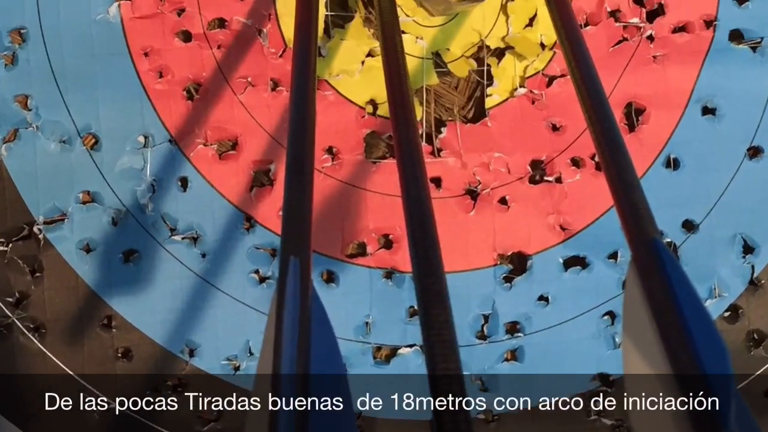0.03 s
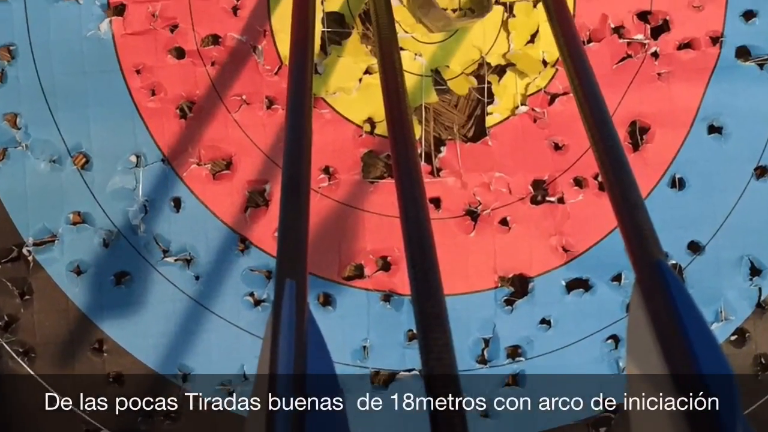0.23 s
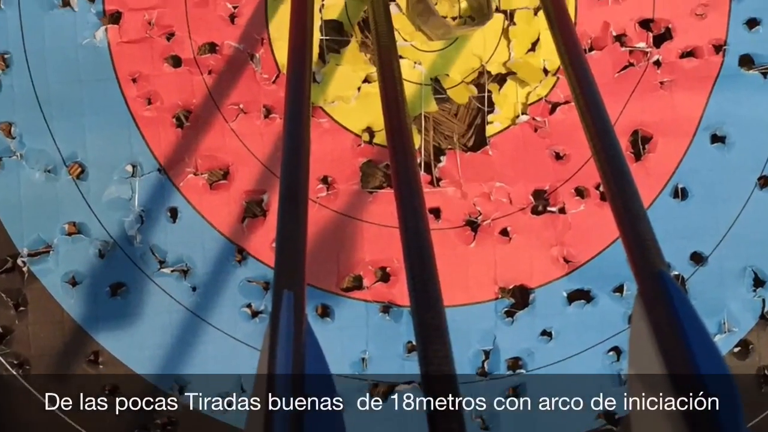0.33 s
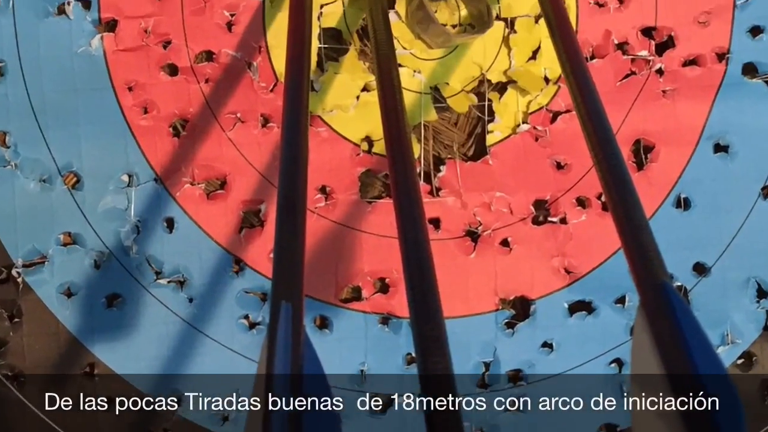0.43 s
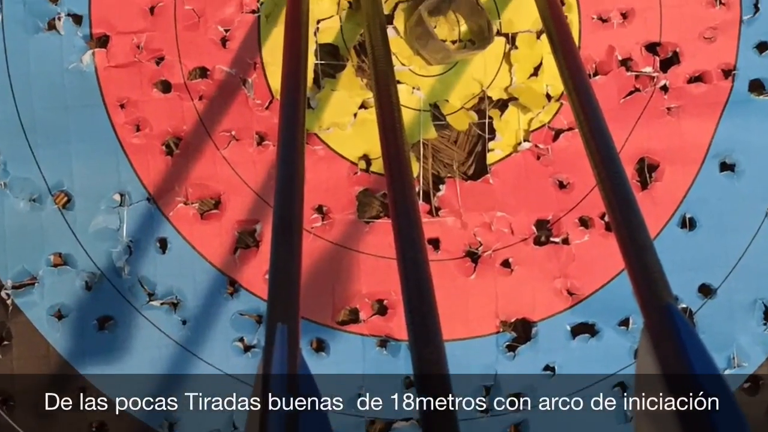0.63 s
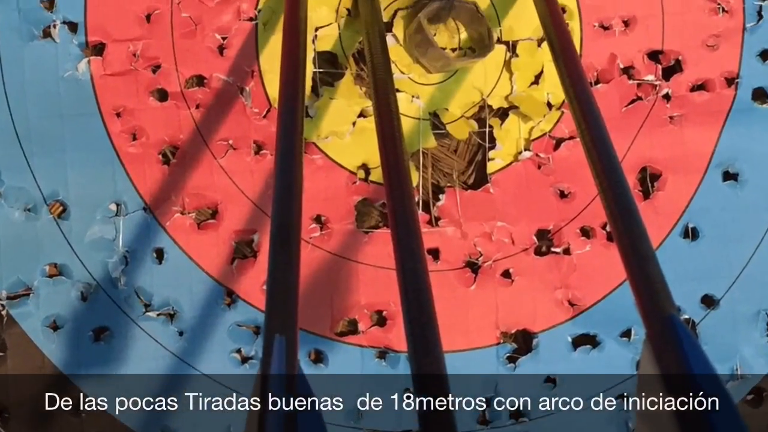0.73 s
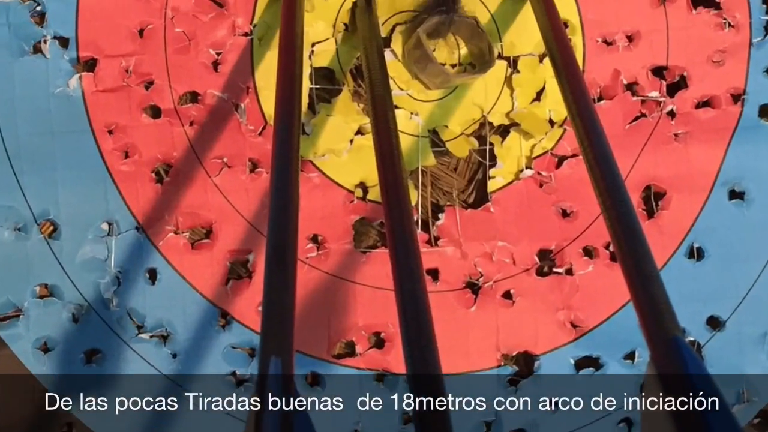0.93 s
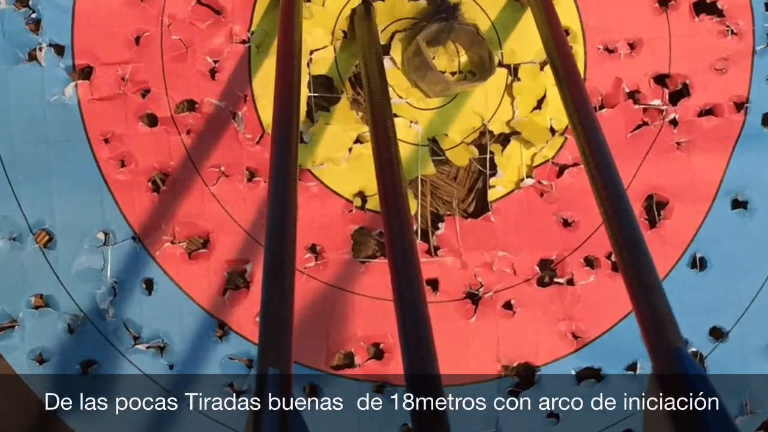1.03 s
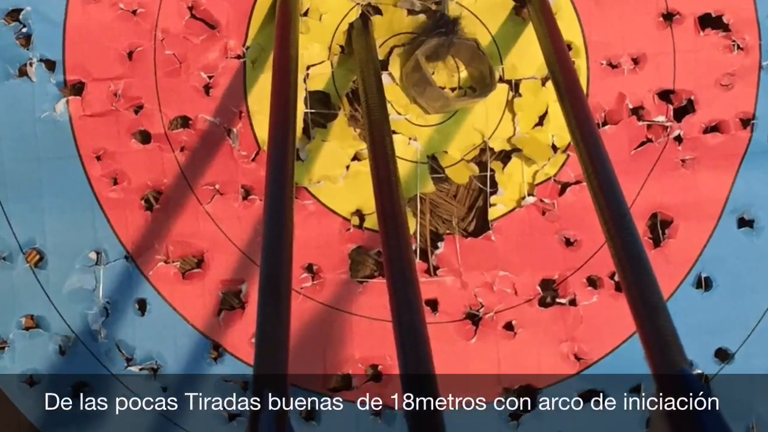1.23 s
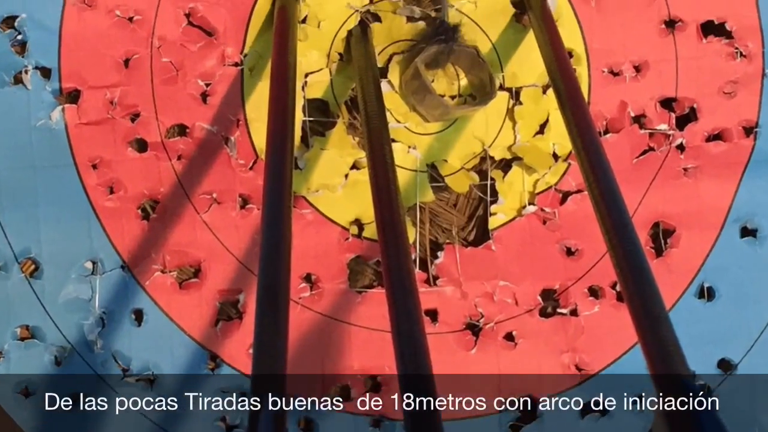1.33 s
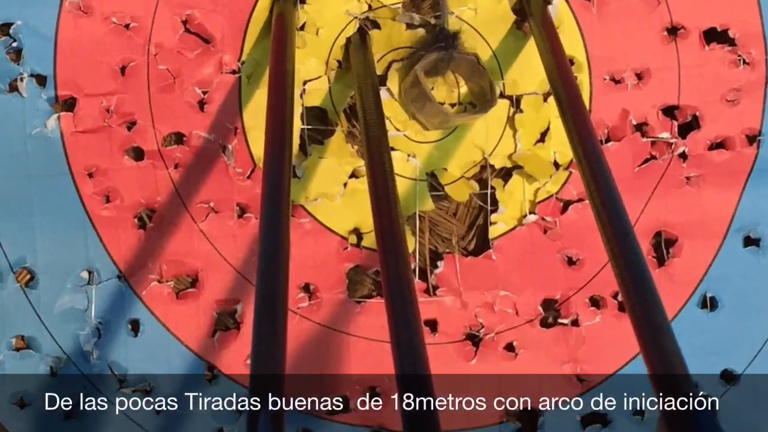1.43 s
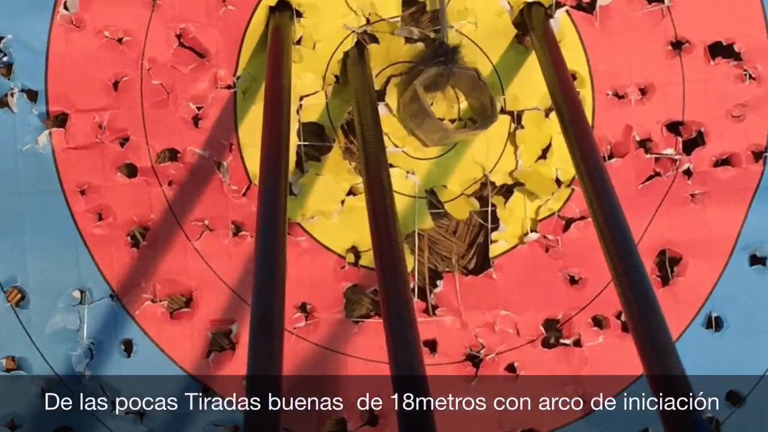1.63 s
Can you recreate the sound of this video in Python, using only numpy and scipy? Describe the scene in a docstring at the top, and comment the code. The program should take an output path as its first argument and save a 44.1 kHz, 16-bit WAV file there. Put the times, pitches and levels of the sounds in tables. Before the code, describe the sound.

Three heavy footsteps crunch on dry, gritty ground, close by outdoors.

```python
"""Dry, gritty ground cracks and crunches under three heavy steps, close by and outdoors.
Each step is a run of dull thuds and crisp snaps as the crust gives way, over a crunch of breaking
grains and a fine rustle of friction. Small stones tick, grit slips, and stray bits snap between steps.
The surroundings answer faintly, and behind it all the air hisses and rumbles softly."""
import sys
import numpy as np
from scipy import signal
from scipy.fft import rfft, irfft, next_fast_len
from scipy.io import wavfile

SR = 44100
rng = np.random.default_rng(int(sys.argv[2]) if len(sys.argv) > 2 else 0)


def to_wav(s):
    """Save 16-bit WAV."""
    ch = np.atleast_2d(s).T  # columns
    pcm = np.round(np.clip(ch, -1, 1) * 32767)  # PCM
    wavfile.write(sys.argv[1], SR, pcm.astype(np.int16))


N = 74970
TIME = np.arange(N) / SR
FFT_SIZE = next_fast_len(2 * N)
FREQS = np.maximum(np.arange(FFT_SIZE // 2 + 1) * SR / FFT_SIZE, 1)

# The crust cracking under the sole: (time [s], thud level [dB], thud pitch [Hz], snap level [dB])
CRUST_CRACKS = [ (0.0189, -31, 657, -26.5), (0.108, -39.5, 620, -30.5), (.183, -25, 595, -34.5),
                (0.1869, -31, 242, -40), (0.213, -16, 507, -27), (0.2222, -19, 740, -32),
                (0.2318, -10, 520, -22.5), (.2355, -16, 534, -26.5), (.2404, -15, 720, -27),
                (0.2467, -23, 680, -26.5), (0.2734, -7, 558, -24), (0.2829, -19, 385, -50),
                (0.2864, -26, 730, -30), (.3705, -30.5, 630, -40), (0.6757, -38.5, 453, -47),
                (0.7215, -40.5, 650, -40.5), (.812, -24.5, 400, -44), (.8396, -27, 780, -36),
                (0.8484, -21, 720, -45), (.851, -29, 725, -28), (.8682, -31, 696, -28),
                (.9021, -24.5, 676, -27), (.9053, -39, 730, -37), (.9297, -32.5, 520, -57),
                (0.9456, -20.5, 483, -34.5), (.9792, -35, 520, -57), (1.0294, -39, 545, -50),
                (1.1065, -35.5, 624, -51), (1.3245, -42, 426, -40.5), (1.4129, -25, 267, -38),
                (1.4159, -18, 480, -40.5), (1.4195, -18.5, 486, -48), (1.4249, -19.5, 454, -40),
                (1.4376, -36, 440, -35), (1.4496, -31.5, 323, -48), (1.4921, -31, 327, -47),
                (1.5273, -35, 524, -52)]
# Foot pressure on the grit, one envelope per step: (time [s], crunch level [dB])
STEP_PRESSURES = [
    [(.178, -42), (.207, -41), (.236, -29), (.258, -38), (.295, -36.5), (.37, -47.5), (.42, -57),
     (.52, -72.5)],
    [(.795, -69.5), (.818, -37.5), (.834, -46.5), (.845, -32.5), (.878, -31.5), (.915, -53), (1.02, -47),
     (1.075, -68), (1.12, -58), (1.21, -72.5)],
    [(1.402, -51), (1.418, -34), (1.445, -43.5), (1.475, -50), (1.503, -40), (1.56, -54), (1.625, -51),
     (1.69, -100)],
]
# Dull tone of the breaking grains: (frequency [Hz], relative level [dB])
CRUNCH_EQ = [(60, -19), (220, -3), (650, 4), (1150, -8.5), (1650, -8), (2700, -31.5), (4500, -32),
             (6500, -30), (16000, -32)]
# Stereo width of the grit: (frequency [Hz], side over mid [dB])
GRIT_WIDTH = [(600, -18.5), (4000, -9)]
# Small hard stones knocking together: (time [s], level [dB], pitch [Hz])
STONE_TICKS = [ (0.0534, -39.5, 1650), (.1503, -42.5, 3230), (.197, -32, 2860), (.4775, -42.5, 2420),
               (0.8592, -43, 3200), (0.8737, -31.5, 2200), (0.953, -41, 1700), (1.0002, -39, 2040),
               (1.123, -41, 3200), (1.1337, -40.5, 2660), (1.1589, -40.5, 1730), (1.2866, -41.5, 3820)]
# Bright scratches of slipping grit: (time [s], level before filtering [dB], band centre [Hz])
GRIT_SLIPS = [(0.2465, -26.5, 4200), (0.339, -35, 10600), (0.3417, -32.5, 11300), (0.4688, -47, 11000),
              (0.8675, -40.5, 10000), (1.3242, -48.5, 11200), (1.491, -42.5, 10000), (1.614, -47.5, 10000)]
# Friction of the moving foot: (time [s], level [dB])
RUSTLE_ENVELOPE = [(0, -69), (.245, -64), (.30, -78), (.35, -48.5), (.43, -63), (.56, -77.5), (.79, -69),
                   (.87, -50.5), (1.06, -75.5), (1.13, -59), (1.23, -75.5), (1.40, -71), (1.422, -46.5),
                   (1.46, -61.5), (1.69, -71.5)]
# Dry tone of that friction: (frequency [Hz], relative level [dB])
RUSTLE_EQ = [(2000, 18.5), (4000, 15.5), (6300, 0), (9000, 11.5), (15000, 3)]
# Tone of the reflections: (frequency [Hz], relative level [dB])
TAIL_EQ = [(320, -18), (750, -10.5), (3000, -2), (9000, -26.5)]
# Rumble and hiss of the open air: (frequency [Hz], relative level [dB])
AIR_EQ = [(45, 3), (110, -14.5), (680, -11), (1400, -20.5), (6200, -36), (9000, -32)]
# Stereo width of the air and the reflections: (frequency [Hz], side over mid [dB])
AMBIENCE_WIDTH = [(30, -7.5), (2000, -11.5)]
# Balance between the microphones: (frequency [Hz], left minus right [dB])
MIC_BALANCE = [(800, 0.24), (4500, 3), (9000, -8), (15000, -15.5)]

THUD_WIDTH, SNAP_WIDTH, TICK_WIDTH = 1.357, 1.47, 1.54   # upper band edge over pitch


def cracks(snap_lag_s=0.0003, soft_contact_hz=2620):
    """The crust gives way: each crack is a dull thud with a crisp snap on top."""
    thuds, snaps = np.zeros((2, N))
    splinter = from_db(-30) * pulse(hz=3460, width=TICK_WIDTH)
    snap = crisp(pulse(hz=1555, width=SNAP_WIDTH) + splinter, db=-14)
    for s, thud_db, hz, snap_db in CRUST_CRACKS:
        weight = from_db(-23.5) * pulse(hz / 2, THUD_WIDTH)   # the soil gives, an octave below
        thud = pulse(hz, THUD_WIDTH) - weight
        add(thuds, s, from_db(thud_db) * thud)
        add(snaps, s + snap_lag_s, from_db(snap_db) * snap)
    soften = signal.butter(1, soft_contact_hz, fs=SR, output="sos")
    return -signal.sosfilt(soften, thuds) - snaps


def crunch(idle_db=-68.5, reference_db=-40.5, spread_db=3.5):
    """Grains break densely under full weight and thin out as the foot settles; a few snap brightly."""
    pressure = from_db(idle_db) + sum(envelope(step) for step in STEP_PRESSURES)
    load = pressure / from_db(reference_db)
    crowding = load ** 0.62   # more pressure breaks more grains
    dull = colour(grains(1100 * crowding, spread_db) * pressure, rms_one(eq_curve(CRUNCH_EQ)))
    chip_ring = pulse(hz=2870, width=SNAP_WIDTH)
    chips = grains(220 * crowding, spread_db) * load ** 0.83   # hard grains follow the load less steeply
    bright = from_db(reference_db - 20) * convolve(chips, chip_ring / np.linalg.norm(chip_ring))
    return stereo(dull + bright, GRIT_WIDTH)


def ticks():
    """Small hard stones knock together, each at its own pitch and with no thud."""
    track = np.zeros(N)
    for s, db, hz in STONE_TICKS:
        add(track, s, from_db(db) * crisp(pulse(hz, TICK_WIDTH), db=2.5))
    return track


def scatter(contacts, db=-3, decay_s=0.0044):
    """Every contact shakes loose a brief spray of grit."""
    spray = rng.standard_normal((2, N)) * np.exp(-TIME / decay_s)
    spray *= np.sqrt(2 / (decay_s * SR))   # unit energy
    return from_db(db) * stereo(convolve(spray, contacts), GRIT_WIDTH)


def scratches(decay_s=0.0022):
    """Grit slips in short, thin bursts of noise."""
    noise = rng.standard_normal((2, N))
    track = np.zeros((2, N))
    for s, db, hz in GRIT_SLIPS:
        burst = from_db(db) * (TIME >= s) * np.exp(-np.abs(TIME - s) / decay_s)
        track += band(noise * burst + 1e-18, hz, width=1.36)
    return track


def rustle():
    """Fine, dry friction swells as the foot moves."""
    friction = grains(per_s=2500, spread_db=6.5) * envelope(RUSTLE_ENVELOPE)
    return colour(friction, rms_one(eq_curve(RUSTLE_EQ)))


def surroundings(feet, db=-9.5, t60_s=0.49, predelay_s=0.013):
    """The ground and things nearby throw back a faint, diffuse tail."""
    decay = from_db(-60 * TIME / t60_s) * (TIME > predelay_s)
    reflections = rng.standard_normal((2, N)) * decay / np.linalg.norm(decay)
    tail = stereo(colour(reflections, eq_curve(TAIL_EQ)), AMBIENCE_WIDTH)
    return from_db(db) * convolve(tail, feet.mean(axis=0))


def air(db=-59.5):
    """A steady bed of outdoor hush over a low rumble."""
    hush = colour(rng.standard_normal((2, N)), rms_one(eq_curve(AIR_EQ)))
    return from_db(db) * stereo(hush, AMBIENCE_WIDTH)


def pulse(hz, width):
    """A heavily damped ring of about two cycles, peaking at 1."""
    ring = band(signal.unit_impulse(1024), hz, width)
    return ring / np.abs(ring).max()


def crisp(sound, db, low_edge_hz=6650):
    """Layer a thin treble click onto the attack of a sound."""
    highpass = signal.butter(2, low_edge_hz, "high", fs=SR, output="sos")
    return sound + from_db(db) * signal.sosfilt(highpass, signal.unit_impulse(len(sound)))


def grains(per_s, spread_db):
    """Two random trains of uneven clicks, with unit power at any rate."""
    sizes = from_db(spread_db * np.minimum(rng.exponential(1, (2, N)), 3))
    signs = rng.choice([-1, 1], (2, N))
    hits = rng.random((2, N)) < per_s / SR
    return rms_one(sizes * signs * hits / np.sqrt(per_s))


def band(x, hz, width):
    """Band-pass from hz / width to hz * width."""
    edges = [hz / width, min(hz * width, SR / 2 - 1)]
    return signal.sosfilt(signal.butter(2, edges, "band", fs=SR, output="sos"), x)


def colour(x, gain):
    """Minimum-phase EQ, so nothing rings ahead of an attack."""
    cepstrum = irfft(np.log(gain), FFT_SIZE)
    cepstrum[1:FFT_SIZE // 2] *= 2
    cepstrum[FFT_SIZE // 2 + 1:] = 0
    return irfft(rfft(x, FFT_SIZE) * np.exp(rfft(cepstrum)), FFT_SIZE)[..., :N]


def stereo(pair, width):
    """Use two unrelated signals as mid and side; return left and right."""
    share = eq_curve(width)
    mid = colour(pair[0], 1 / np.hypot(1, share))
    side = colour(pair[1], share / np.hypot(1, share))
    return np.array([mid + side, mid - side])


def envelope(points):
    """Gain from (time [s], level [dB]) points, silent outside them."""
    s, db = np.transpose(points)
    return from_db(np.interp(TIME, s, db, left=-np.inf, right=-np.inf))


def eq_curve(points):
    """Gain from (frequency [Hz], level [dB]) points."""
    hz, db = np.transpose(points)
    return from_db(np.interp(np.log(FREQS), np.log(hz), db))


def convolve(pair, mono):
    """Convolve both channels with one mono sound."""
    return signal.fftconvolve(pair, mono[None], axes=1)[:, :N]


def add(track, s, sound):
    """Mix a sound into a track at s seconds."""
    start = int(s * SR)
    track[start:start + len(sound)] += sound[:max(N - start, 0)]


def from_db(db):
    """Decibels to gain."""
    return 10 ** (np.asarray(db) / 20)


def rms_one(x):
    """Scale to unit power."""
    return x / np.sqrt(np.mean(x ** 2) + 1e-20)


def scene():
    """Footsteps up front, their tail and the air behind."""
    contacts = cracks() + ticks()
    feet = contacts + scatter(contacts) + crunch() + rustle() + scratches()
    return feet + surroundings(feet) + air()


def record(dry):
    """The right microphone has more top treble and hears it all slightly earlier; the very top is cut."""
    left_lag_samples, cutoff_hz = 3, 16100
    balance = eq_curve(MIC_BALANCE)
    pan = np.array([balance, np.ones_like(balance)]) * np.sqrt(2 / (1 + balance ** 2))   # equal power
    left, right = irfft(rfft(dry, FFT_SIZE) * pan, FFT_SIZE)[:, :N]
    late_left = np.pad(left, (left_lag_samples, 0))[:N]
    high_cut = signal.ellip(10, 0.1, 80, cutoff_hz, fs=SR, output="sos")
    return signal.sosfilt(high_cut, np.array([late_left, right]))


dry = scene()
out = record(dry)
to_wav(out)
```